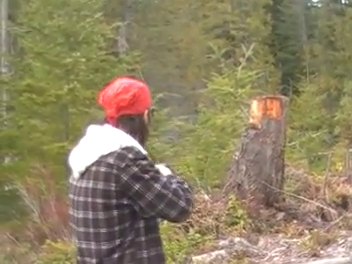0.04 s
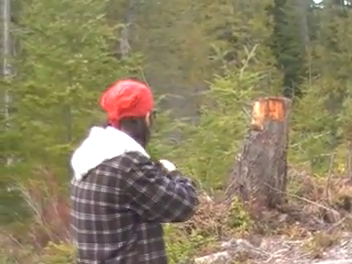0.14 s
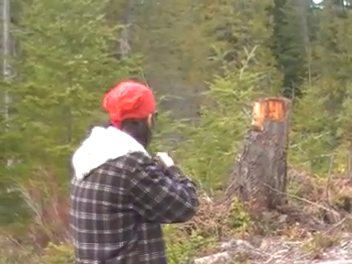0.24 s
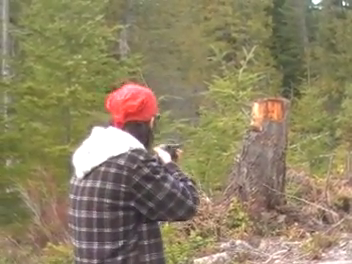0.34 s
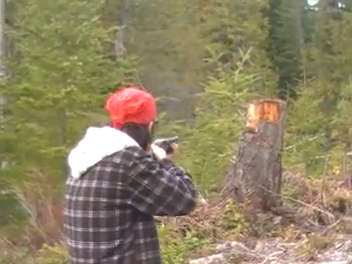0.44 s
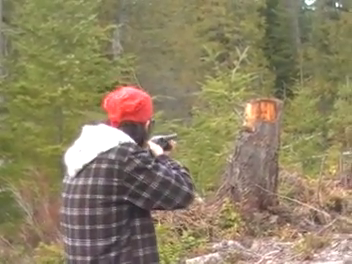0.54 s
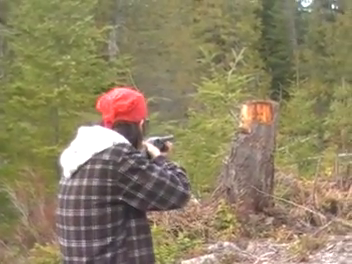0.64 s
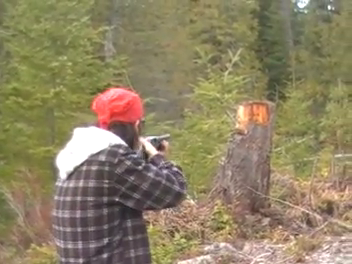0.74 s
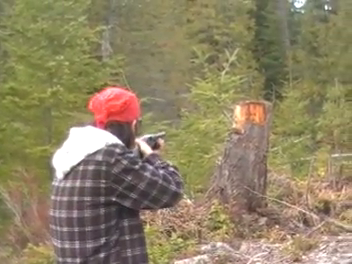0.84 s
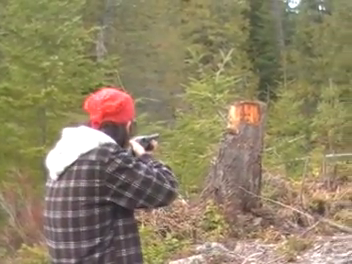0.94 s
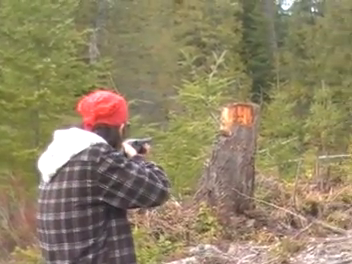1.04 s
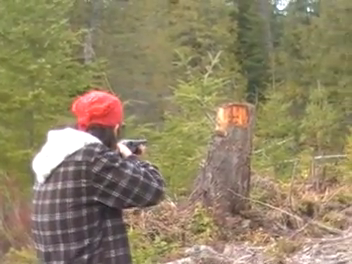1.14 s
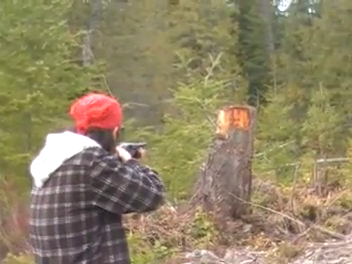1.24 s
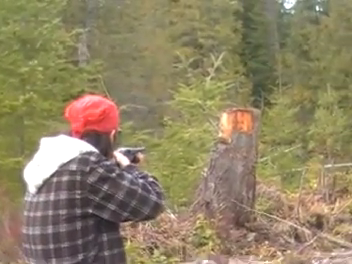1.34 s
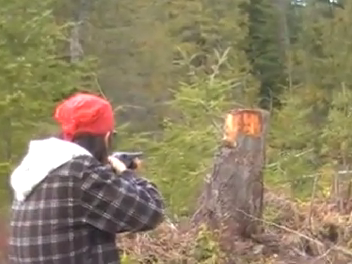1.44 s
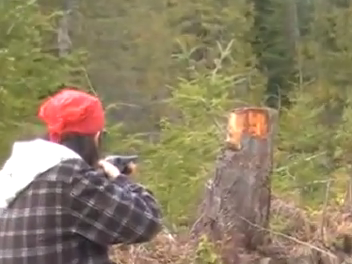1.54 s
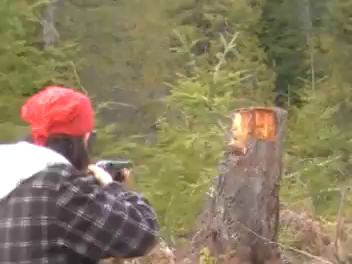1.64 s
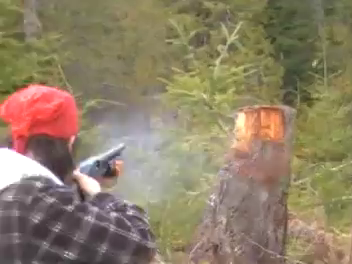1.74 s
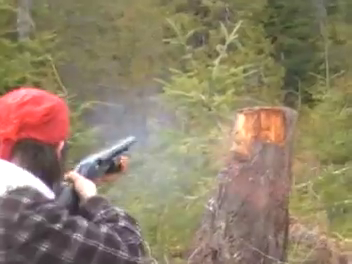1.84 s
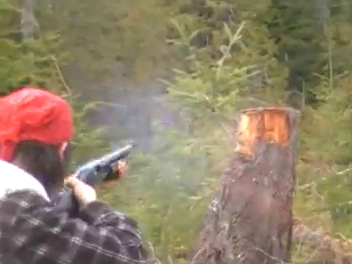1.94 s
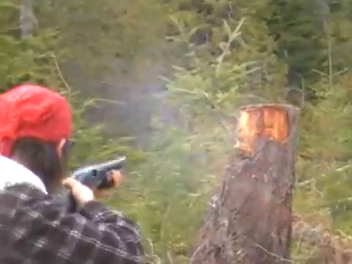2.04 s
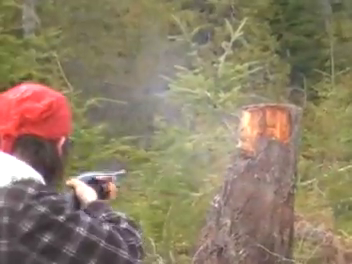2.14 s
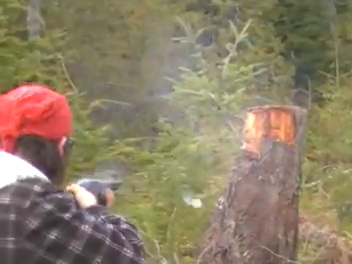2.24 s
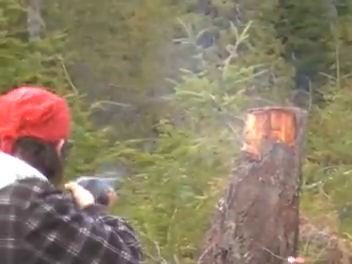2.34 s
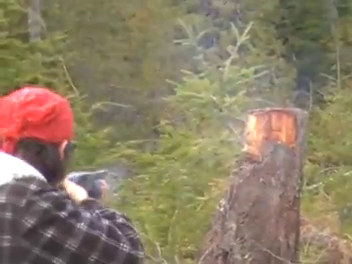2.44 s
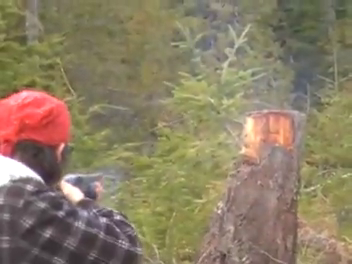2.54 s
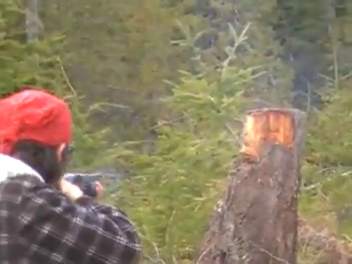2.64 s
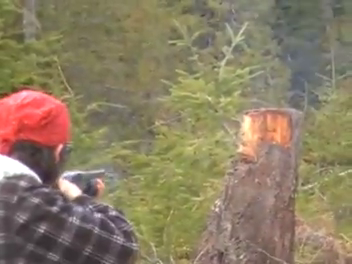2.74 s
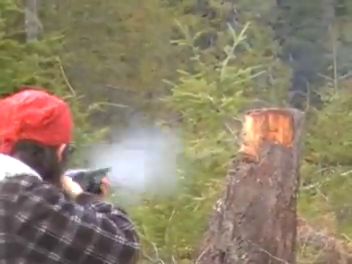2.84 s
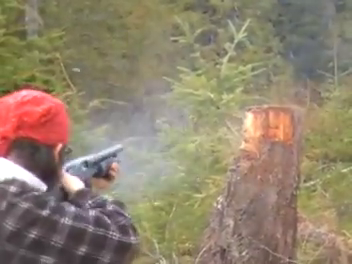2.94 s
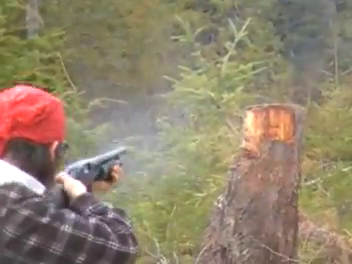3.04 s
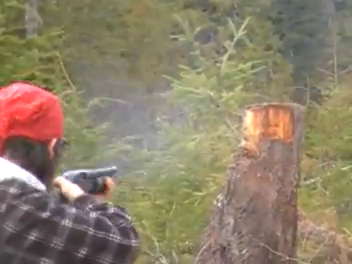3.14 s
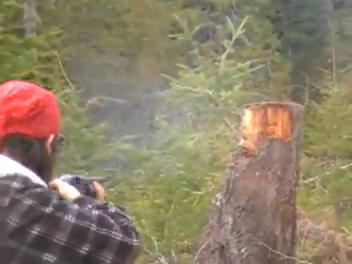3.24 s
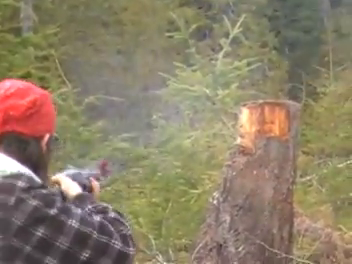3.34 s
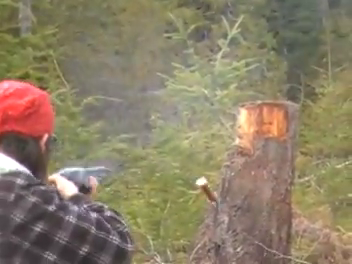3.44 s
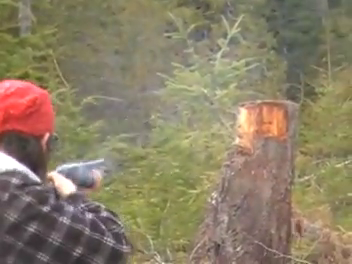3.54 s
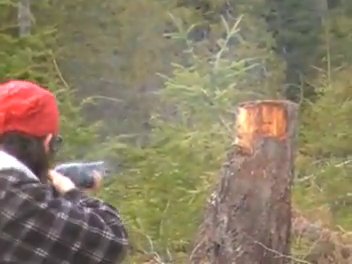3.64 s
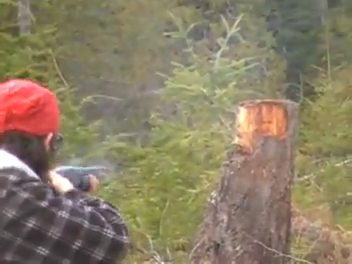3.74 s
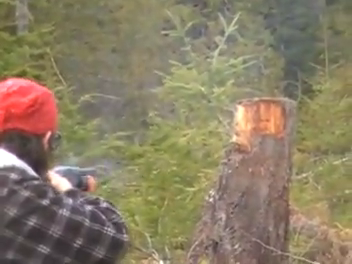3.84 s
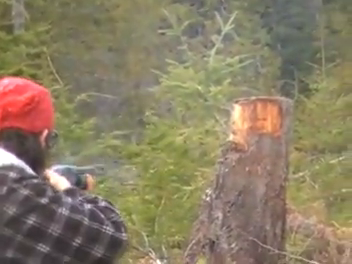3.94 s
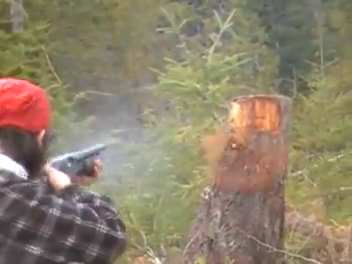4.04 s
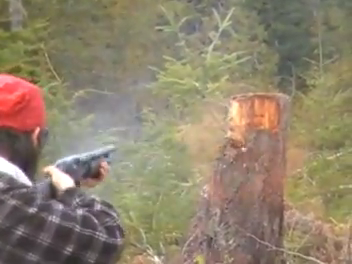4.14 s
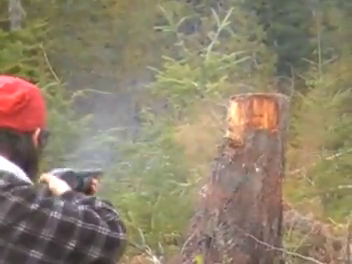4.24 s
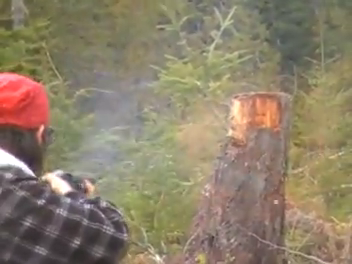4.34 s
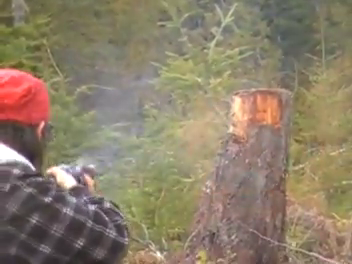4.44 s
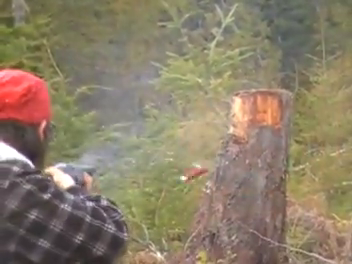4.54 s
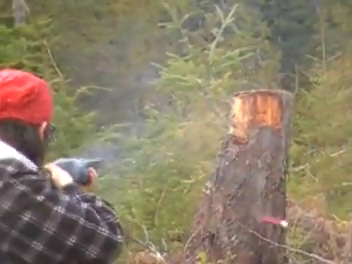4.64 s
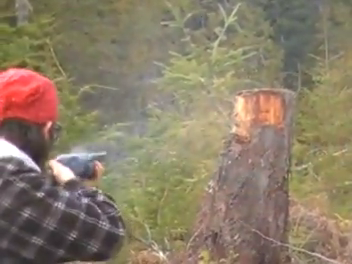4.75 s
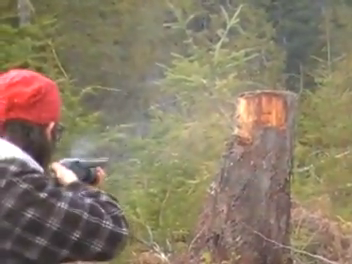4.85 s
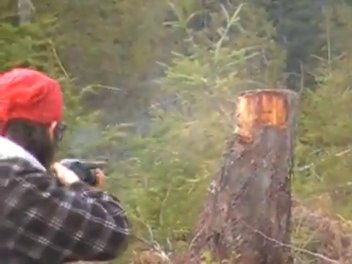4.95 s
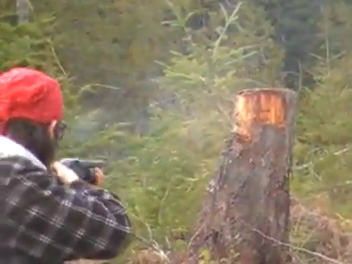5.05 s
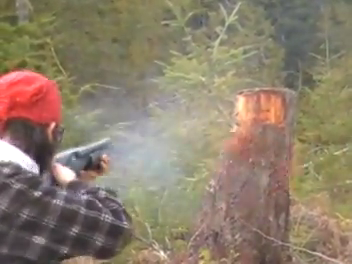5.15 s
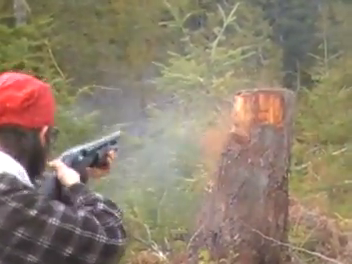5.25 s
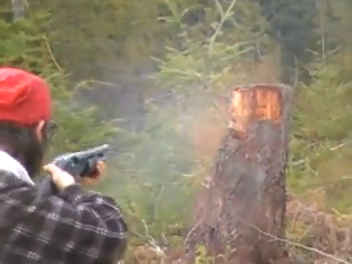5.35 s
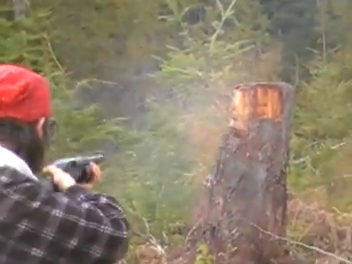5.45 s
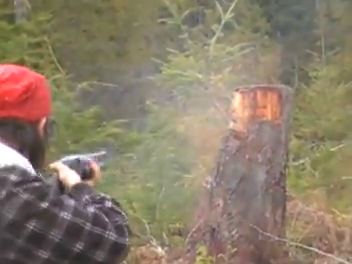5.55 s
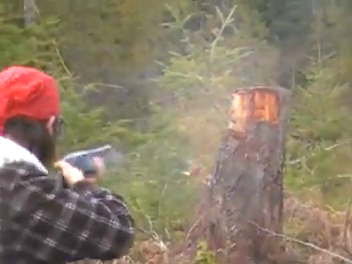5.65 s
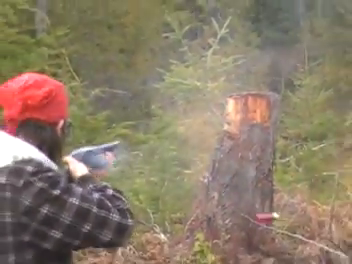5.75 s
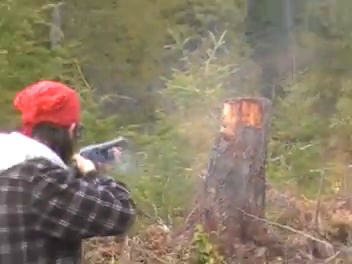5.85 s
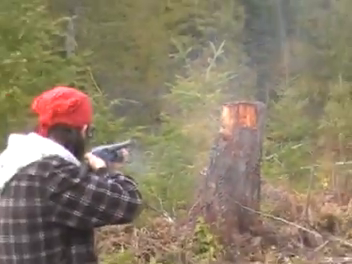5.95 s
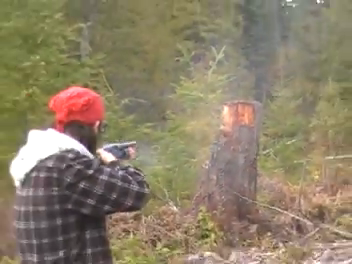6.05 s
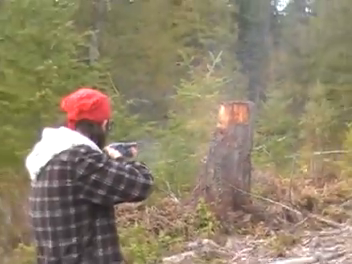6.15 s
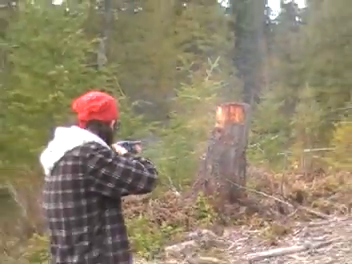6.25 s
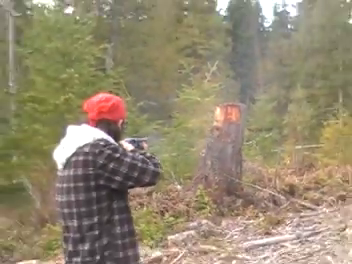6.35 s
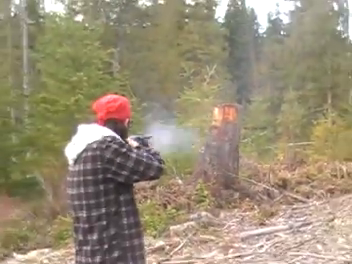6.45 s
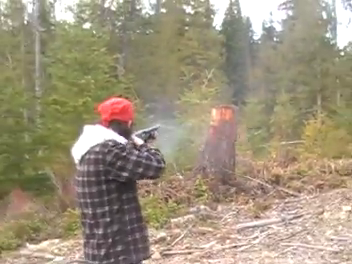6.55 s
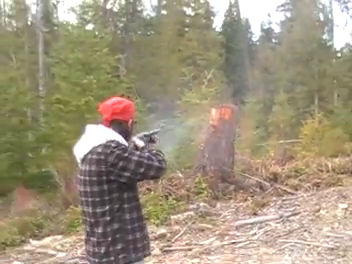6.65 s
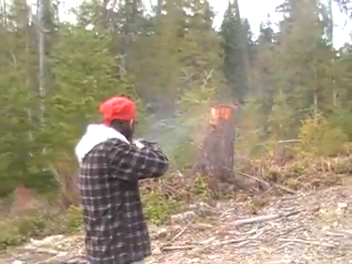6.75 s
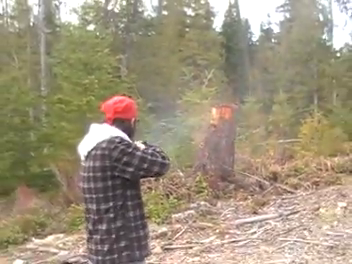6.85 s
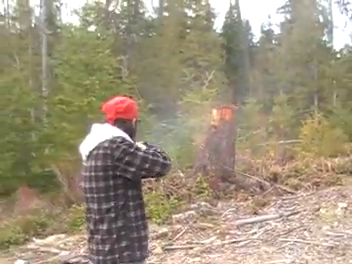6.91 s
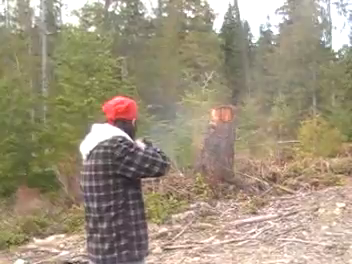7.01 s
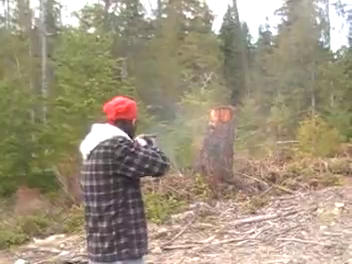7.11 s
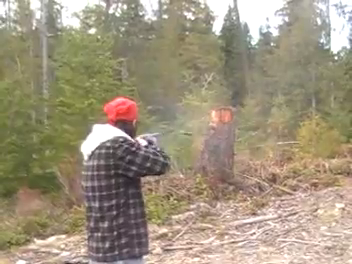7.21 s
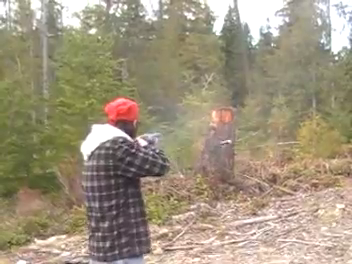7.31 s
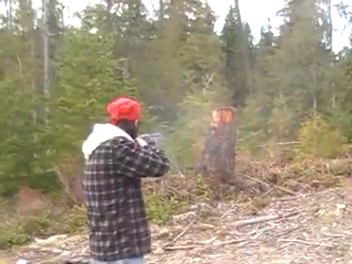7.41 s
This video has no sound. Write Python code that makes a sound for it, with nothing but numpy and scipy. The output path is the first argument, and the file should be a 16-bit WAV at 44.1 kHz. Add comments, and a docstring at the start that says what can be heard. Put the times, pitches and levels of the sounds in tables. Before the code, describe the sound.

Soft outdoor hush with gun handling clicks and cloth rub, then five cracking shotgun blasts at a steady pace. After every blast a rolling woodland echo swells and fades under a bright two-part metallic rack with a ringing ejected shell. Recorded close behind the shooter by a small stereo camera microphone, clipped on the peaks, its automatic gain dipping and recovering.

```python
"""Pump-action shotgun in a forest clearing

A shotgun is shouldered and fired five times, and racked after each shot: filtered noise bursts ring steel modes.
Each blast is a low push under a noise crack; nearby brush scatters it as a fading spray of clumped noise.
A quarter second later the far tree line answers with a long rolling echo of shaped noise.
An automatic gain control ducks at every blast and creeps back up, which holds the echo up."""
import sys
import numpy as np
from scipy import signal
from scipy.fft import rfft, irfft, next_fast_len
from scipy.io import wavfile
from scipy.ndimage import uniform_filter1d, map_coordinates

SR = 44100
rng = np.random.default_rng(int(sys.argv[2]) if len(sys.argv) > 2 else 0)


def store_pcm(level_fs):
    """Save levels as 16-bit WAV."""
    pcm = np.round(np.clip(level_fs, -1, 1) * 32767).astype(np.int16)
    wavfile.write(sys.argv[1], SR, np.atleast_2d(pcm).T)


N = 329823  # length in samples


def amp(db):
    """Level to gain: 20 dB is a factor of ten in pressure."""
    return 10 ** (np.asarray(db) / 20)


def seconds(length):
    """A time axis of a given length in seconds, sampled uniformly."""
    return np.arange(int(length * SR)) / SR


def along(points, hz):
    """(f/Hz, value) points interpolated on a logarithmic frequency axis."""
    f, v = np.transpose(points)
    return np.interp(np.log(hz + 1), np.log(f + 1), v)


def envelope(t, rise, hold, fade_db):
    """Linear rise, plateau, then exponential decay by fade_db a second."""
    return np.clip(t / rise, 0, 1) * amp(-fade_db * np.maximum(t - rise - hold, 0))


def colour(x, gain_db, size=4096):
    """Minimum-phase filter of unit energy: folding the cepstrum makes the dB curve gain_db(f) causal."""
    magnitude = amp(gain_db(np.fft.rfftfreq(size, 1 / SR)))
    cepstrum = irfft(np.log(magnitude + 1e-6))
    half = size // 2
    causal = 2 * cepstrum[:half] * (np.arange(half) > 0)
    kernel = irfft(np.exp(rfft(causal, size)))[:half]
    kernel = kernel / np.linalg.norm(kernel)
    return signal.fftconvolve(np.atleast_2d(x), kernel[None], axes=1)[:, :x.shape[-1]]


def shaped(x, spectrum):
    """Spectral shaping of x by a (f/Hz, level/dB) table."""
    return colour(x, lambda hz: along(spectrum, hz))


def noise(t, alike):
    """Partial coherence: two white noises mixed to the given correlation."""
    a, b = rng.standard_normal((2, len(t)))
    turn = np.arccos(np.clip(alike, -1, 1)) / 2
    return np.cos(turn) * a + np.sin(turn) * np.array([b, -b])


def spread(t, likeness):
    """Frequency-dependent coherence: two white noises correlated by a (f/Hz, correlation) table."""
    hz = np.fft.rfftfreq(len(t), 1 / SR)
    turn = np.arccos(np.clip(along(likeness, hz), -1, 1)) / 2
    spectra = rfft(rng.standard_normal((2, len(t))))
    mid, side = irfft(spectra * [np.cos(turn), np.sin(turn)], len(t))
    return np.array([mid + side, mid - side])


def grain(t, rate, depth_db):
    """Random amplitude modulation of mean power near 1, clumping noise into separate arrivals."""
    steps = rng.standard_normal(int(t[-1] * rate) + 4)
    gain = amp(depth_db * map_coordinates(steps, [t * rate]))
    power = uniform_filter1d(gain ** 2, size=2048)
    return gain / np.sqrt(np.abs(power) + 1e-9)


def pan(right_db):
    """Interchannel level difference: gains for a source louder on the right."""
    return amp([[-right_db / 2], [right_db / 2]])


def add(track, s, sound):
    """Superposition: mix a sound in at time s."""
    start = max(round(s * SR), 0)
    track[:, start:start + sound.shape[-1]] += sound[:, :N - start]


def air():
    """Stationary noise: partly coherent forest hush, with a faint tonal whine and a narrow-band whirr."""
    # hush spectrum: f/Hz, level/dB
    hush_spectrum = [(18, -53.5), (30, -34.5), (161, -15.5), (326, -5.5), (463, -12), (525, -6.5),
                     (960, -6), (1060, -4.5), (1260, -12), (1990, -12.5), (4790, -21.5), (5560, -21),
                     (6000, -17), (9430, -24.5), (12100, -40.5), (15800, -66.5), (22000, -120)]
    # left-right likeness of the hush: f/Hz, correlation
    hush_alike = [(60, -0.4), (350, -0.27), (2010, 0.26), (11700, 0.41)]
    whirr_band = [(4700, -50), (5350, 0), (5800, 0), (6500, -50)]  # f/Hz, level/dB
    t = np.arange(N) / SR
    hush = amp(-56.5) * shaped(spread(t, hush_alike), hush_spectrum)
    whine = amp(-69) * np.sin(2 * np.pi * 1090 * t) * grain(t, rate=25, depth_db=3.0)
    flutter = noise(t, alike=.5) * grain(t, rate=60, depth_db=5)
    whirr = amp(-68) * shaped(flutter, whirr_band)
    return (hush + whine + whirr) * pan(right_db=2.5)


def ringing(t):
    """Modal decay: a blow excites the steel's modes at random phase and strength, near rms 1 at the start."""
    # modes of the receiver and magazine tube: f/Hz, mean level/dB, t60/s
    modes_table = [(1227, -3, 0.027), (2320, -1, 0.017), (3000, -9, 0.04), (3730, -6, 0.007),
                   (4400, -2, 0.036), (5770, -9, 0.037), (6460, -4, 0.037), (6500, -5.5, 0.036),
                   (6920, 4, 0.03), (7580, -2, 0.047), (9330, 3, .04)]
    hz, db, t60 = np.transpose(modes_table)[:, :, None]
    size = amp(db + rng.normal(0, 3.515, db.shape))
    phase = rng.uniform(0, 2 * np.pi, db.shape)
    modes = size * amp(-60 * t / t60) * np.sin(2 * np.pi * hz * t + phase)
    return modes.sum(axis=0) / np.sqrt(np.sum(size ** 2) / 2)


def click(hz, octaves, t60):
    """Impact of a small gun part: impulse, rattle and modes pass through a broad resonance; peak 1."""
    t = seconds(0.34)
    snap = amp(8.5) * (t == 0) + noise(t, alike=0.58) * amp(-60 * t / 0.0062)
    rattle = amp(-4.0) * noise(t, alike=0.84) * amp(-60 * t / t60)
    ring = amp(-5.5) * ringing(t) * amp(-20 * t / t60)

    def body(f):
        """Resonance of the struck part: its skirts fall with distance in octaves, the top octave fades."""
        resonance = -11 * np.log2(1 + (np.log2((f + 1) / hz) / octaves) ** 2 / 2)
        return resonance - 6 * np.log2(1 + (f / 9000) ** 6)

    sound = colour(snap + rattle + ring, body)
    return sound / np.abs(sound).max()


def handling():
    """Impact and friction: short clicks of steel and stock, and the rub of sleeve and stock on the jacket."""
    # clicks and knocks: t/s, peak level/dB, centre f/Hz, width/octaves, rattle t60/s
    clicks = [(.020, -16.5, 3200, 2.2, 0.028), (0.235, -25.5, 4800, 2, 0.026),
              (0.288, -20, 5200, 0.52, 0.024), (.481, -29, 4300, .9, .02), (.490, -24.5, 4800, 0.94, .025),
              (.616, -21.5, 1390, .7, 0.028), (.634, -26, 1420, 0.68, 0.037),
              (0.913, -22.5, 1560, 0.48, 0.016), (.925, -27, 1400, 2.3, .05),
              (1.060, -19.5, 1290, 1.5, 0.0092), (1.259, -20, 575, 1.1, 0.035),
              (1.285, -24, 8100, 0.56, 0.059), (1.379, -36, 350, 0.85, .025),
              (2.644, -12.5, 6800, .5, 0.069), (2.710, -5, 5800, 0.9, 0.039), (3.623, -5.5, 6900, 2, 0.028),
              (3.917, -4, 6500, 2.1, 0.046), (5.033, -16.5, 7000, 0.78, .03),
              (6.131, -21, 6900, 0.36, .035), (6.381, -32, 7560, .4, .03)]
    # rubs: t/s, level/dB, length/s
    rubs = [(0.546, -43.5, 0.053), (0.994, -53, 0.1), (1.282, -44.5, 0.062), (1.315, -45, 0.043)]
    # cloth spectrum: f/Hz, level/dB
    cloth = [(59, -48), (100, -25), (398, -2.5), (1460, -4), (2620, -12), (3260, -14), (7720, -14),
             (12000, -34), (15600, -55.5), (22000, -120)]
    out, t = np.zeros((2, N)), seconds(0.67)
    for s, db, hz, octaves, t60 in clicks:
        add(out, s, amp(db) * click(hz, octaves, t60))
    for s, db, length in rubs:
        rub = 4 * t / length * np.exp(1 - 4 * t / length)  # peaks a quarter of the way in
        friction = noise(t, alike=0.76) * rub * grain(t, rate=412, depth_db=4.5)
        add(out, s, amp(db) * shaped(friction, cloth))
    return out


def stroke(slide, slide_db):
    """Friction then impact: action bars scrape, the bolt catches, the slide hits its stop; all rings the steel."""
    # steel spectrum: f/Hz, level/dB
    steel_spectrum = [(530, -16), (900, -4.5), (1270, -12), (2040, -6), (2320, -2), (2950, -7.5),
                      (3280, -14.5), (3870, -2.5), (4810, -14.5), (5540, -4), (7110, -3), (7670, -3),
                      (9750, -13), (10300, -17), (12100, -18), (15800, -72), (22000, -120)]
    t = seconds(0.26)

    def steel(hz):
        """Radiation of the steel, weak below 300 Hz."""
        return along(steel_spectrum, hz) - 12 * np.log2(1 + (300 / (hz + 1)) ** 2)

    def strike(at, t60):
        """Sudden onset and exponential decay of one contact."""
        return (t >= at) * amp(-60 * np.abs(t - at) / t60)

    scrape = amp(slide_db) * (t < slide) * np.sqrt(t / slide) * grain(t, rate=1300, depth_db=8.5)
    stop = amp(0.5) * strike(slide, t60=0.024)
    catch = amp(-8.5) * strike(slide - .006, t60=0.083)
    tail = amp(-25) * strike(slide, t60=0.36)
    clack = colour(noise(t, alike=1.0) * (scrape + stop + catch + tail), steel)
    modes = ringing(t)
    ring = signal.fftconvolve(clack, modes[None] / np.linalg.norm(modes), axes=1)[:, :len(t)]
    return clack + amp(-9) * ring


def pump():
    """Successive impacts: the slide comes back, the spent shell rings off the port, the slide goes home."""
    # racks: back stop t/s, level/dB, forward stop t/s, level/dB
    racks = [(2.164, 10, 2.3847, 1.5), (3.339, 9, 3.557, 1.5), (4.448, 7.5, 4.669, 1.5),
             (5.557, 7.5, 5.791, 1.5), (7.149, 8, 7.375, -3.5)]
    # the slide before each stop: length in s, level in dB relative to the stop
    back_slide_s, back_slide_db, forward_slide_s, forward_slide_db = 0.029, -17.5, 0.025, -5.5
    eject_s, eject_db = .036, -8  # delay after the back stop, level relative to it
    out = np.zeros((2, N))
    for back, back_db, forward, forward_db in racks:
        add(out, back - back_slide_s, amp(back_db) * stroke(back_slide_s, back_slide_db))
        shell = click(hz=7840, octaves=0.27, t60=0.14)
        add(out, back + eject_s, amp(back_db + eject_db) * shell)
        add(out, forward - forward_slide_s, amp(forward_db) * stroke(forward_slide_s, forward_slide_db))
    return out * pan(right_db=1.0)


def forest():
    """Multiple reflection: the wood's answer to one blast; the trees stand still, so it serves every shot."""
    # stands of trees that send back a roll: t/s after the shot, level/dB, rise/s, hold/s, fade/(dB/s)
    stands = [(0.053, -3, 0.0046, 0.032, 315), (0.237, 1.5, 0.029, 0.028, 202), (0.303, -4, .07, 0.1, 32),
              (0.88, -18, 0.042, 0.28, 24)]
    # slaps of the biggest trunks, out of the roll: t/s after the shot, peak level/dB
    slap_table = [(0.041, 20), (.057, 22.5), (.074, 18), (.086, 17.5), (0.2337, 12.5), (.2675, 11.5),
                  (0.2808, 12), (0.293, 14)]
    # nearer and distant echo spectra: f/Hz, level/dB
    echo = [(41, -77), (70, -47.5), (359, -7.5), (427, -14), (577, -7), (716, 1), (967, -3), (1280, -15.5),
            (1810, -8.5), (2100, -17.5), (2340, -14.5), (3670, -20), (4760, -25.5), (7010, -22.5),
            (12000, -53.5), (15600, -112.5), (22000, -120)]
    distant_spectrum = [(41, -99), (70, -57), (197, -17), (308, -5.5), (480, -7), (749, -1.5), (986, -3.5),
                        (1300, -11.5), (1510, -8), (2550, -15), (4070, -23.5), (5710, -34), (6350, -35),
                        (8350, -46.5), (11000, -54), (14300, -102), (22000, -120)]
    # treble balance left by the air on the longest paths: f/Hz, level/dB
    air_loss = [(1500, 2.5), (4000, -3.5), (7000, -5.5), (12000, -6)]
    t = seconds(2)
    power = sum((amp(db) * envelope(t - s, rise, hold, fade_db)) ** 2
                for s, db, rise, hold, fade_db in stands)
    swell = np.sqrt(power)
    # later arrivals crowd together, so the roll gets smoother
    lumpy = np.interp(t, [.3, 1], [1, .5])
    arrivals = noise(t, alike=0.95) * grain(t, rate=220, depth_db=2.96 * lumpy)
    arrivals = arrivals * grain(t, rate=35, depth_db=2.0) * swell
    # longer paths lose their treble in air and needles
    far = np.interp(t, [.4, .85], [0, 1])
    farthest = np.interp(t, [.7, .95], [0, 1])
    dulled = shaped(arrivals * far * farthest, air_loss) * amp(-5.5)
    distant = arrivals * far * (1 - farthest) + dulled
    roll = shaped(arrivals * (1 - far), echo) + shaped(distant, distant_spectrum)
    slaps, u = np.zeros((2, N)), seconds(0.055)
    branches = rng.standard_normal((len(slap_table), 2, len(u)))
    for (delay, db), smear in zip(slap_table, branches):
        dull = np.interp(delay, [.29, .7], [0, 1])
        bark = lambda hz: (1 - dull) * along(echo, hz) + dull * along(distant_spectrum, hz)
        # the trunk mirrors the wave front, its branches smear what follows
        twigs = (smear[0] + amp(-12.5) * smear[1] * [[1], [-1]]) * amp(-60 * u / 0.0072)
        slap = colour(amp(11.5) * (u == 0) + twigs, bark)
        add(slaps, delay, amp(db) * slap / np.abs(slap).max())
    return (roll + slaps[:, :len(t)]) * pan(right_db=1.0)


def muzzle_wave(t):
    """Impulsive gas release: a turbulent crack riding on one clean push of air below the crossover."""
    crossover_hz = 160
    split = lambda kind: signal.butter(2, crossover_hz, kind, fs=SR, output="sos")
    # a sharp rise, held up by its bounce off the ground, then a fast fade
    burst = envelope(t, rise=0.0014, hold=0.0065, fade_db=2799.5)
    rush = noise(t, alike=0.74) * burst
    push = amp(23) * (t == 0)  # relative to the rush
    return amp(23) * (signal.sosfilt(split("highpass"), rush) + signal.sosfilt(split("lowpass"), push))


def shots():
    """Direct sound, scattering and echo: the muzzle wave, a spray from the brush, then the forest."""
    # shots: t/s, crack brightness/(dB/octave), echo level/dB, echo fade offset/(dB/s, positive fades faster)
    shot_table = [(1.7026, 3, -1.5, -5.5), (2.8678, 0, 0.5, -1.5), (3.9920, -1, 2.5, 2.5),
                  (5.0975, 0, 3.5, 6), (6.4660, 0, 4, 8)]
    # crack and near scatter spectra: f/Hz, level/dB
    blast = [(24, -52), (40, -19.5), (172, -21), (722, -3), (1080, -9), (1630, -3.5), (2070, -0.5),
             (2500, -2.5), (3410, -12), (4130, -7), (4660, -18.5), (5380, -5), (7340, -4.5), (11000, -19),
             (12100, -27.5), (15800, -65), (22000, -120)]
    near = [(35, -45), (60, -27.5), (233, -10.5), (325, 1), (463, -7), (738, -4), (1200, 3), (1340, -2.5),
            (1470, -5), (2240, -2.5), (3270, -6.5), (4170, -5), (4770, -9.5), (6800, -1.5), (12100, -23),
            (15800, -66), (22000, -120)]
    # left-right likeness of the scatter from the brush: f/Hz, correlation
    brush_alike = [(60, 0.16), (140, 0.73), (350, 1), (840, 0.65), (2010, 0.55), (4850, 0.96),
                   (11700, 0.68)]
    thicket_s, db_per_doubling = 0.052, 13.5  # delay to the thicket's edge, loss per doubled delay beyond
    brush_rise_s, needles_db_per_s = 0.0033, 6.5  # the needles absorb on the way
    clearing_s = .23  # round trip to the edge of the clearing
    out, t, u = np.zeros((2, N)), seconds(2), seconds(0.97)
    answer, still_twigs = forest(), spread(u, brush_alike)
    # scatter is even out to the edge of the thicket, then weakens
    spreading = amp(db_per_doubling * np.log2((u + 1 / SR) / thicket_s))
    spray = amp(14.5) * np.minimum(u / brush_rise_s, 1) / np.hypot(1, spreading)
    spray = spray * amp(-needles_db_per_s * u)
    for s, bright_db, echo_db, fade_db in shot_table:
        crack = lambda hz: along(blast, hz) + bright_db * np.log2(hz + 1)
        add(out, s, colour(muzzle_wave(u), crack))
        # the muzzle shifts a little between shots, so only half of the near scatter repeats
        twigs = (still_twigs + spread(u, brush_alike)) / np.sqrt(2)
        add(out, s, shaped(twigs * grain(u, rate=680, depth_db=2.0) * spray, near))
        # each shot's echo level comes in gradually over the round trip
        echo_gain_db = echo_db * np.minimum(t / clearing_s, 1) - fade_db * t
        add(out, s, answer * amp(echo_gain_db))
    return out


def microphone(x):
    """Interchannel level and phase: two ports hear the same sound unequally and slightly out of step."""
    # sensitivity of the left port against the right: f/Hz, level/dB
    balance = [(60, 10), (150, -4.5), (500, -4), (1500, -3), (4000, -1.1), (8000, 0), (12000, -2)]
    # phase by which the left port leads the right: f/Hz, phase/rad
    ports = [(0, 0), (260, 0.65), (4740, -0.4), (7670, 1), (8350, -1.37), (10600, -0.83), (11800, -1.3)]
    m = next_fast_len(N + 8192)
    hz = np.fft.rfftfreq(m, 1 / SR)
    # half of each difference goes to either side
    left = amp(along(balance, hz) / 2) * np.exp(1j * along(ports, hz) / 2)
    return irfft(rfft(x, m) * np.array([left, 1 / left]), m)[:, :N]


def scene():
    """Superposition of the gun and its echoes, heard through the two ports, over the quiet air."""
    return microphone(shots() + pump() + handling()) + air()


def gain_control(x, threshold_db, slope, release_db):
    """Compression: gain falls quickly on a loud sound and returns at release_db a second."""
    power = uniform_filter1d(np.mean(x ** 2, axis=0), size=200)
    level_db = 10 * np.log10(np.abs(power) + 1e-12)
    ramp = release_db * np.arange(N) / SR
    wanted_db = slope * np.maximum(level_db - threshold_db, 0)
    # a running maximum on a rising ramp holds each cut and releases it linearly in dB
    cut_db = np.maximum.accumulate(wanted_db + ramp) - ramp
    return x * amp(-uniform_filter1d(cut_db, size=40))


def low_pass(x, top_hz):
    """Band limiting: a steep zero-phase cut above top_hz."""
    m = next_fast_len(N + 8192)
    hz = np.fft.rfftfreq(m, 1 / SR)
    return irfft(rfft(x, m) / (1 + (hz / top_hz) ** 80), m)[:, :N]


def record(dry):
    """Compression and overload: peaks past full scale clip, adding a little fizz above the first band limit."""
    held = gain_control(low_pass(dry, top_hz=12400), threshold_db=-13, slope=0.78, release_db=12)
    return low_pass(np.clip(held, -1, 1), top_hz=16000)


dry = scene()
out = record(dry)
store_pcm(out)
```